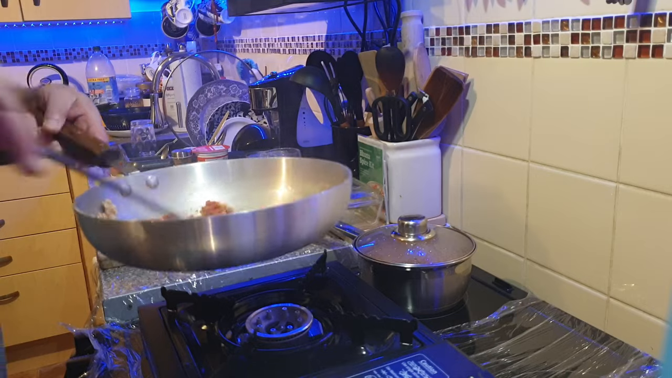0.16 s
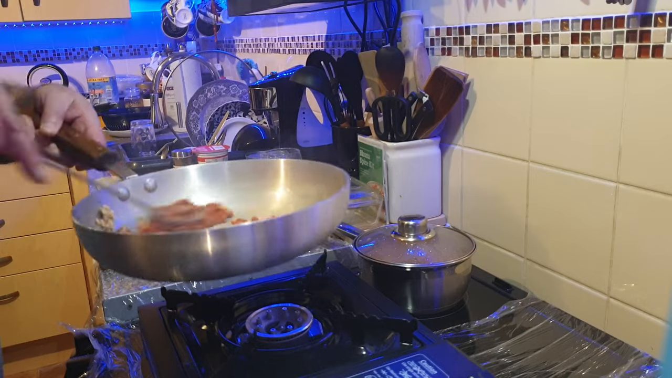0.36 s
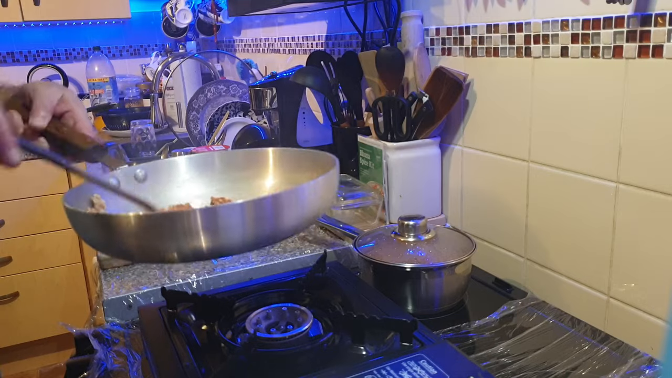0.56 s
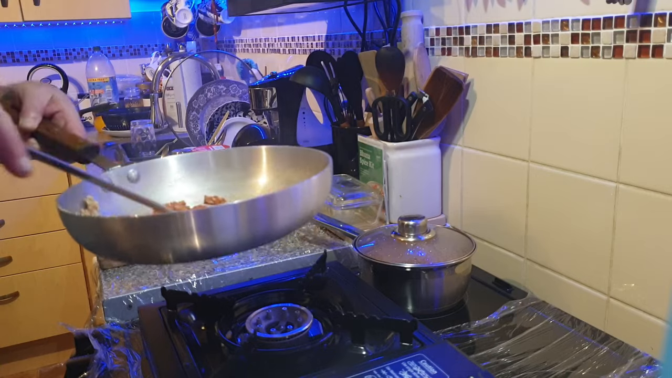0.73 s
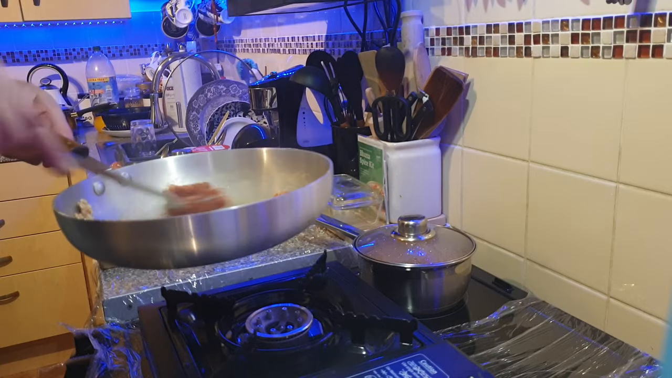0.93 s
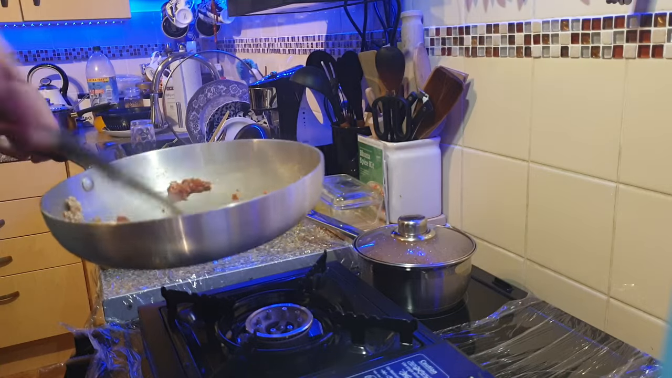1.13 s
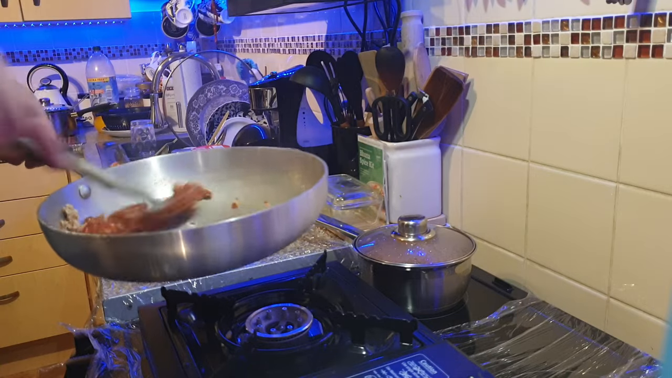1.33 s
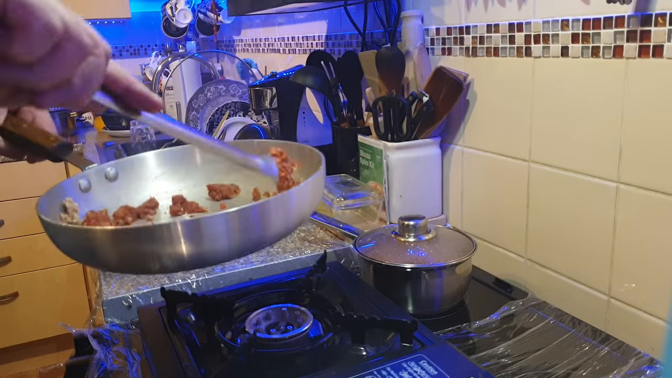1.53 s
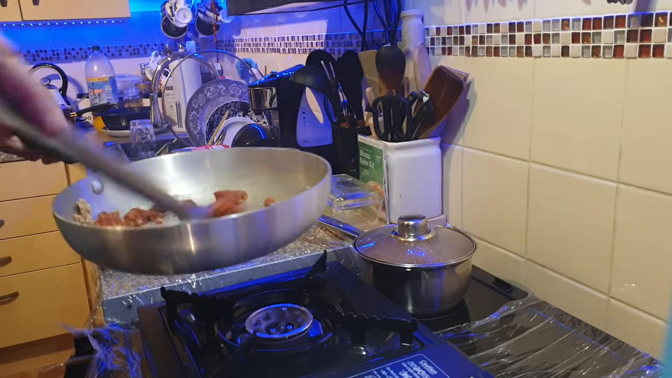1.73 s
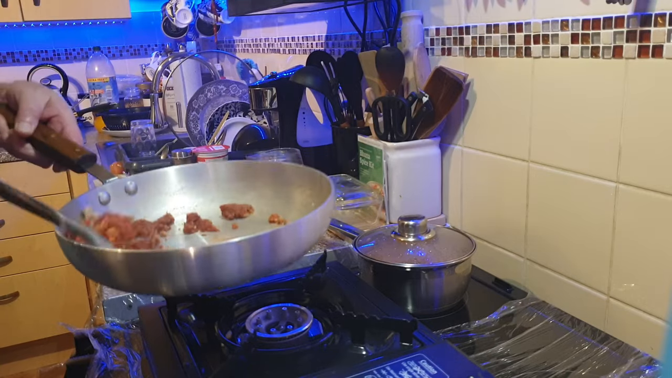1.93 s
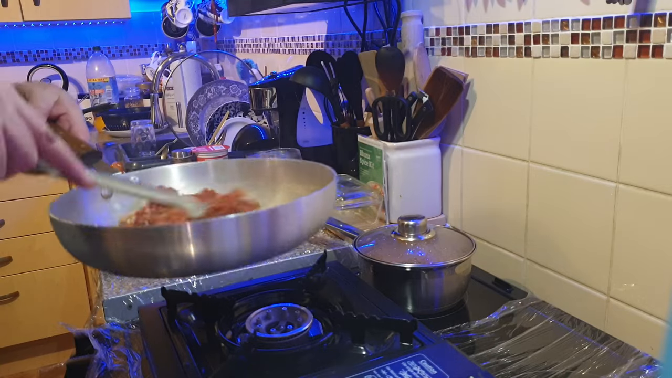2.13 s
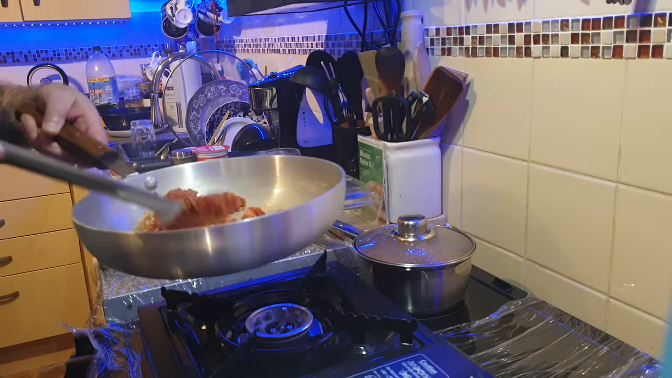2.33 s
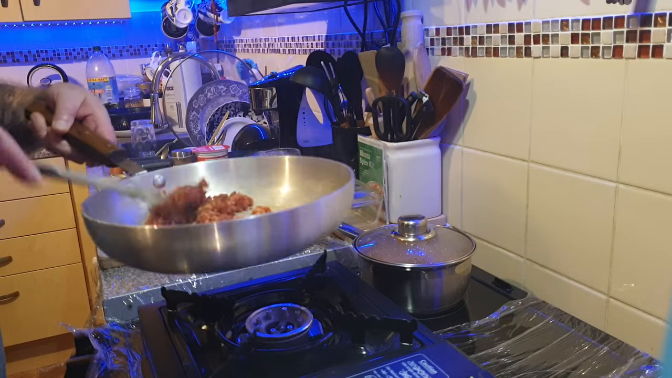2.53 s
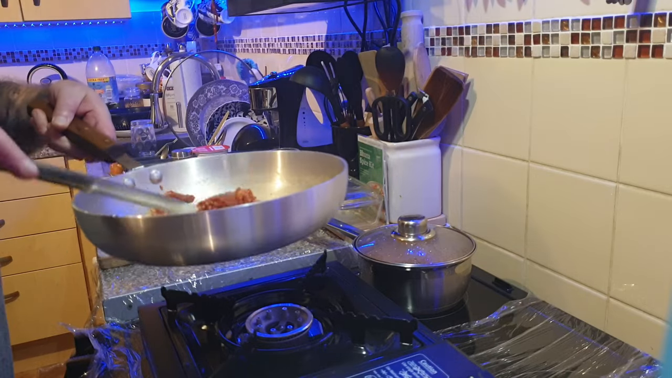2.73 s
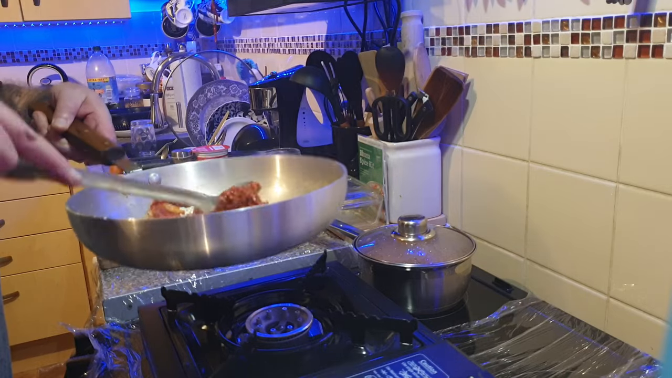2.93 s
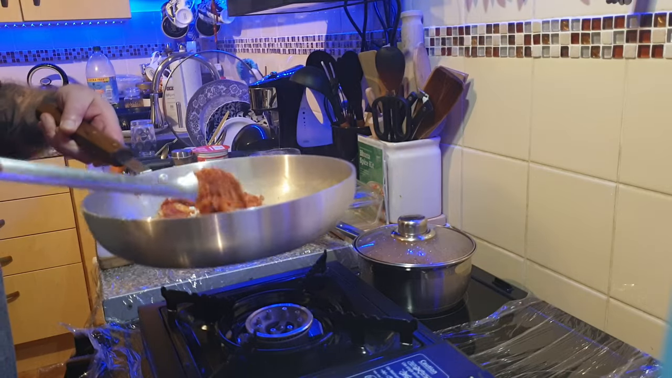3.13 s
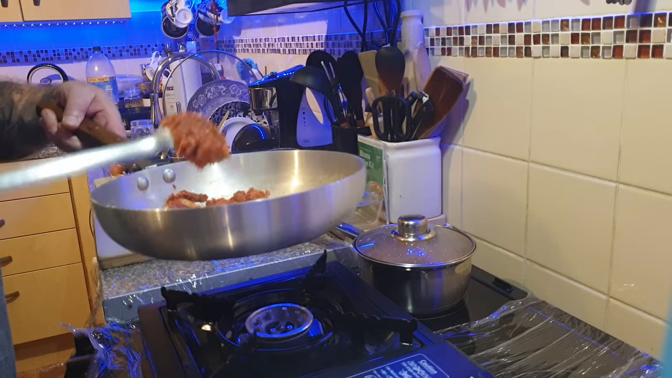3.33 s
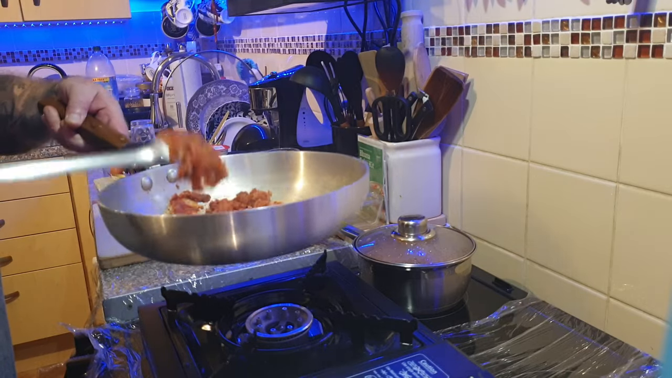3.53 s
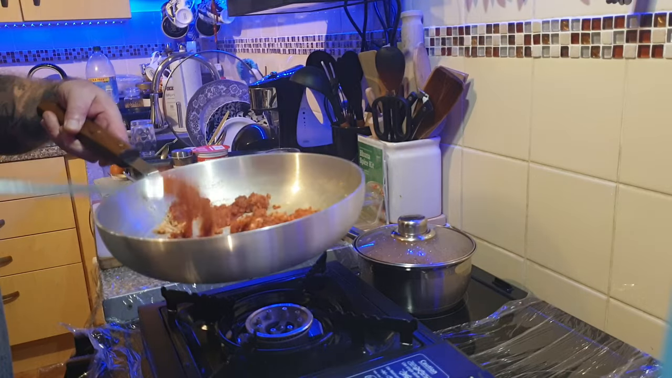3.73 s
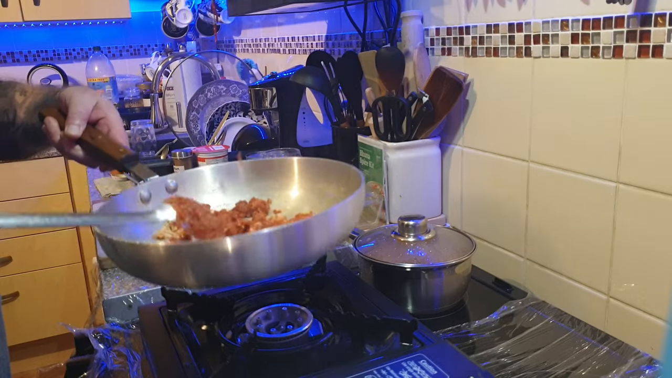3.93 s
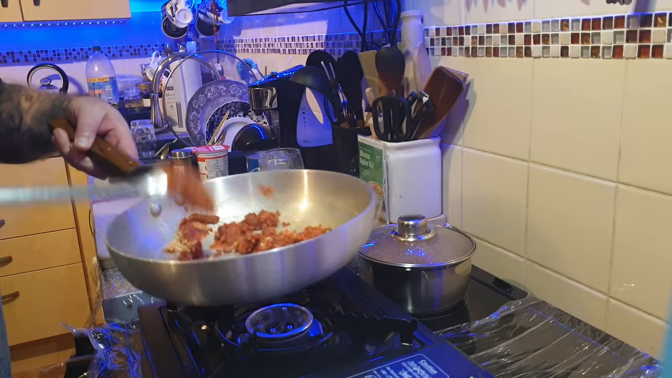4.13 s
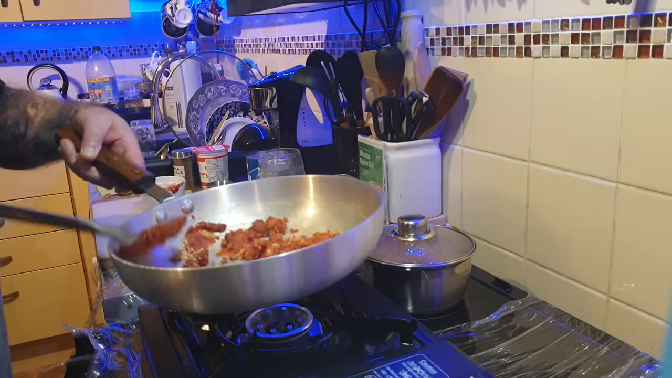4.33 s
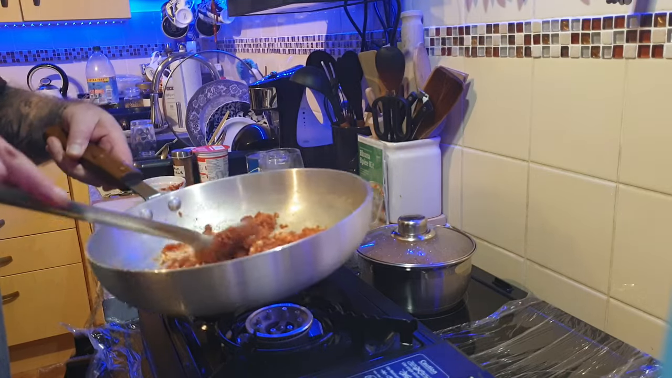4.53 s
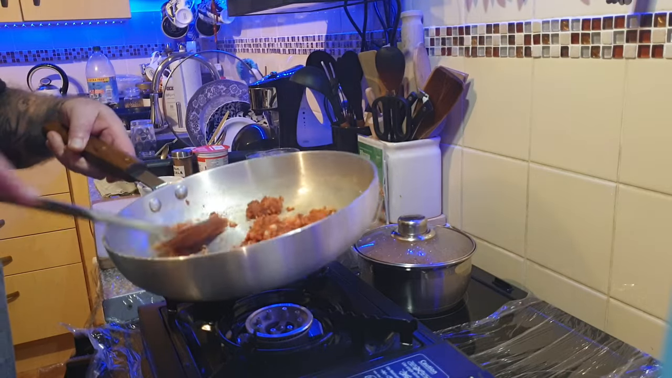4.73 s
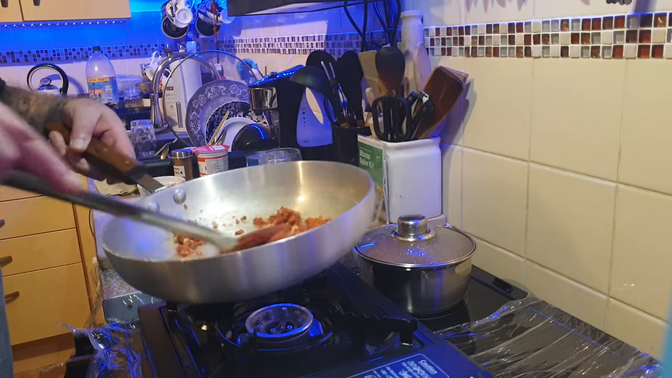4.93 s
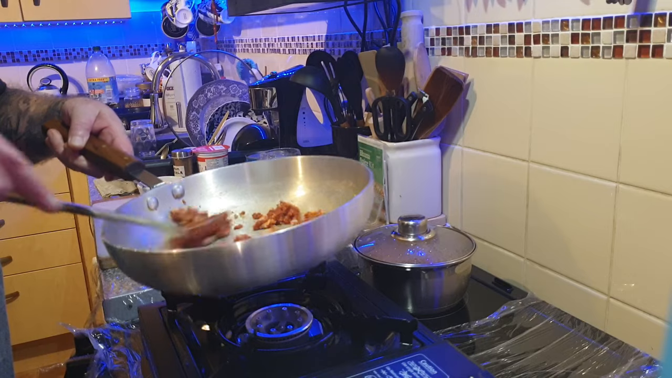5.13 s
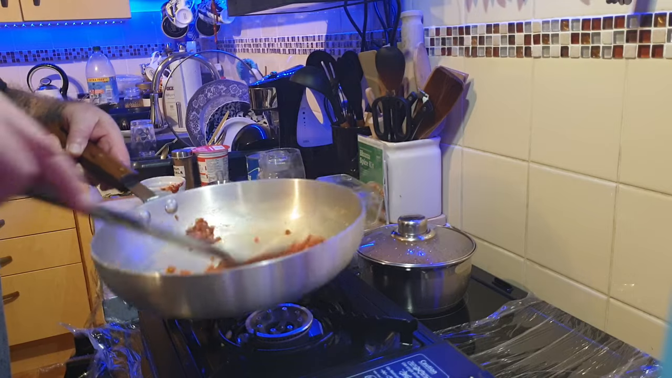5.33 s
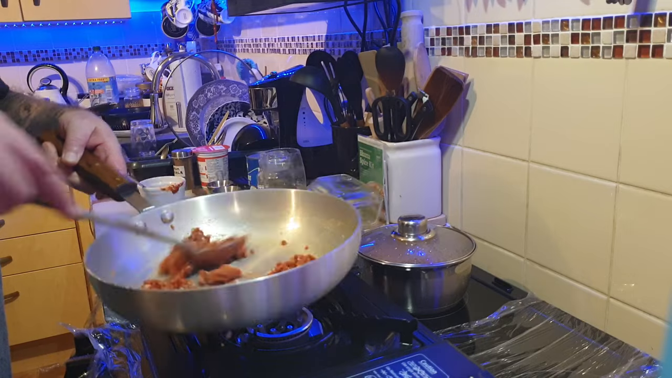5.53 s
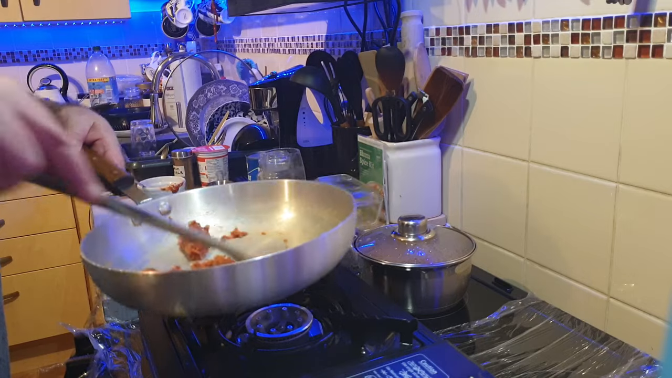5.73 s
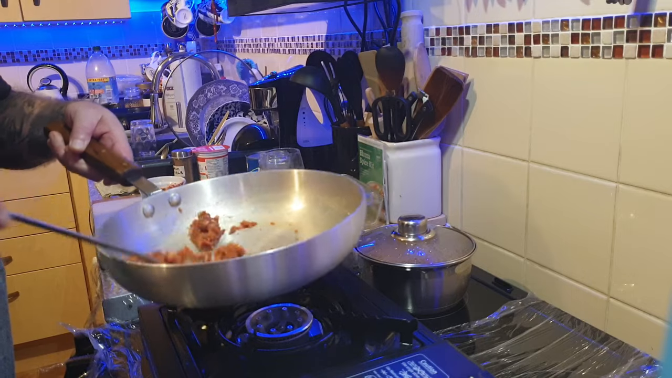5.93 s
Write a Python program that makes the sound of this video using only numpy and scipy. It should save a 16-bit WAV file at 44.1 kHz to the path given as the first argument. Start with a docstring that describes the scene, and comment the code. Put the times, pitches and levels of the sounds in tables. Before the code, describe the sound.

A thick paste fries in a steel pan, heard close in stereo in a small tiled kitchen. A dense, bright, crackly sizzle starts strongest, dips and swells unevenly, with bumps around 0.4, 1.3 and 1.9 seconds. Beneath lie a low flame and fan hum and two faint thin tones. A metal spoon makes soft gritty drags, with dull nudges of the pan floor and small damped taps around 1.2, 1.7 to 2.1 and 2.7 seconds. At 3.4 a solid clunk rings out, then two very loud, bright clanks hit the rim at 3.7 and 3.95, each with a tiny bounce and low thump, decaying quickly. The recording level drops at these knocks and stays down, so sizzle and hum are fainter. Taps follow near 4.4, then short raspy scrapes from 4.45 to 5.3, a fuller hollow stroke with a sizzle swell at 5.5, and a last tap at 5.9.

```python
"""A thick paste sizzles in a steel pan while a steel spoon scrapes and stirs; then the spoon
knocks loudly on the rim. The sizzle is a random train of bubble bursts, the spoon rings damped modes
of the steel, and a low hum of flame and fan with two thin tones lies beneath as filtered noise.
The recorder's gain control turns everything down at the loud knocks and hardly recovers."""
import sys
import numpy as np
from scipy import signal
from scipy.io import wavfile
from scipy.ndimage import uniform_filter1d

SR = 44100
rng = np.random.default_rng(int(sys.argv[2]) if len(sys.argv) > 2 else 0)


def ratio_of_db(decibels):
    """Turn decibels (scalar or array-like) into linear amplitude factors; 0 dB maps to 1."""
    return 10 ** (np.asarray(decibels, float) / 20)


def dump(signal):
    """Clip the signal to [-1, 1] and save it as 16-bit WAV at the path in sys.argv[1]."""
    limited = np.clip(np.atleast_2d(signal).T, -1, 1)
    pcm = np.round(limited * 32767).astype(np.int16)
    wavfile.write(sys.argv[1], SR, pcm)


N = 263277

# Colour of the microphone pair: (frequency [Hz], left minus right [dB])
LEAN = [(60, -1.5), (200, -0.5), (500, -1), (1100, -2.5), (2000, -2), (3000, -0.5), (4200, -6),
        (6300, -11.5), (7500, -0.5), (8300, -3.5), (9500, 11), (10700, -10), (12000, -2), (14000, -7),
        (15500, 6)]
# Strong modes of pan and spoon, damped by paste and hand: (frequency [Hz], level [dB], t60 [s])
PAN_MODES = [(660, -14, .08), (755, -5, .14), (850, -2, .15), (935, -9, .11), (1490, -3, .14),
             (1560, -9, .1), (1845, -12, .11), (2030, -12, .1), (2388, -3, .13), (2485, -6, .1),
             (2682, -1, .12), (2845, -2, .13), (2950, -6, .12), (3230, -11, .11), (3591, -8, .11),
             (3738, -1, .13), (3900, -5, .12), (4221, -6, .11), (4452, -8, .11), (4770, -7, .2),
             (5200, -8, .11), (5361, -1, .18), (5717, -3, .13), (5921, -2, .15), (6400, -8, .12),
             (6655, -1, .13), (7050, -11, .1), (7494, -1, .15), (8640, -10, .09), (8845, -11, .11),
             (10300, -5, .12), (11700, -13, .1)]
# Edges between five groups of modes: frequency [Hz]
GROUP_EDGES = [1200, 2150, 4200, 7800]
# Loud knocks on the free rim:
# (time [s], energy [dB], bounce delay [s], bounce relative level [dB], thump level [dB])
RIM_KNOCKS = [(3.7035, -24.5, 0.028, -8.5, -16), (3.948, -22.5, 0.018, -8, -17)]
# Taps on the paste-covered steel: (time [s], energy [dB], brightness [dB per group],
# mode left ringing [Hz], its level [dB], thud level [dB])
TAPS = [(1.173, -61, -0.5, 850, -39.5, -50), (1.68, -71, -1, 755, -41, -54),
        (1.754, -60, 3, 2845, -27.5, -50), (1.861, -63.5, -3, 1560, -31, -30),
        (1.866, -66, 1, 755, -32, -44), (2.106, -67, 6, 3520, -29.5, -50), (2.671, -60, 1, 660, -45, -24.5),
        (2.682, -52.5, 1.5, 6400, -31, -45), (3.4415, -33.5, 0, 1480, -17, -8),
        (3.444, -47.5, 3.5, 8640, -11.5, -19), (4.388, -52.5, -0.5, 1845, -17, -21),
        (4.392, -58, -2, 2485, -22, -56), (4.454, -59, -1.5, 2800, -29, -26),
        (5.9256, -47.5, 1.5, 5600, -26, -37)]
FLOOR_HZ = 855  # lowest strong mode of the pan floor


def evened(x):
    """Normalisation: scales a signal to an rms of 1."""
    return x / np.sqrt(np.mean(x ** 2) + 1e-20)


def read(points, hz):
    """Interpolation of a spectrum on a logarithmic frequency axis."""
    f, value = np.transpose(points)
    return np.interp(np.log(hz + 1), np.log(f + 1), value)


def add(mix, s, sound):
    """Superposition: adds a stereo sound to the mix from time s [s]."""
    part = mix[:, round(s * SR):][:, :sound.shape[1]]
    part += sound[:, :part.shape[1]]


def pair(left, other, hz):
    """Interchannel coherence: blends two independent spectra into a pair that is alike in the bass."""
    # (frequency [Hz], left-right likeness [0 to 1])
    likeness = [(60, 1), (180, 0.81), (550, 0.83), (1650, 0), (4970, 0), (15000, 0.066)]
    same = np.clip(read(likeness, hz), 0, 1)[:, None]
    lean = ratio_of_db(read(LEAN, hz) / 2)[:, None]
    right = same * left + np.sqrt(1 - same ** 2) * other
    return np.array([left * lean, right / lean])


def hum():
    """Filtered noise for flame and fan rumble; phase diffusion broadens two thin tones into narrow lines."""
    # Rumble spectrum: (frequency [Hz], relative density [dB per Hz])
    rumble = [(15, -29), (25, -25), (65, -9), (86, 0.5), (102, 6), (174, -10.5), (271, -2), (287, 2.5),
              (312, -60), (325, -34), (344, -12), (374, -1.5), (442, -1.5), (530, -15), (700, -6),
              (910, -14), (1540, -120)]
    # Steady appliance tones: (frequency [Hz], line width [Hz], level [dB])
    whines = [(348.7, 1.62, -50.5), (6480, 21, -55)]
    hz = np.fft.rfftfreq(4096, 1 / SR)
    a, b, c, d = rng.standard_normal((N // 1024 + 5, len(hz), 4)).T
    z = pair(a + 1j * b, c + 1j * d, hz) * ratio_of_db(read(rumble, hz))[:, None]
    noise = signal.istft(z, nperseg=4096, noverlap=3072)[1][:, :N]
    out = ratio_of_db(-49) * evened(noise)
    for tone_hz, width_hz, db in whines:
        drift = np.cumsum(rng.standard_normal(N)) * np.sqrt(2 * np.pi * width_hz / SR)
        lean = ratio_of_db(read(LEAN, tone_hz) / 2)
        tone = np.sin(2 * np.pi * tone_hz * np.arange(N) / SR + drift)
        out += ratio_of_db(db) * np.outer([lean, 1 / lean], tone)
    return out


def sizzle(pops_per_s=7000, spread_db=2.0, patchy_db=-1.37, tail_s=0.18, wet=1.0):
    """Shot noise: thousands of steam bubbles burst at random each second; the tiles smear them a little."""
    # Loudness course: (time [s], level before the lift in the mix [dB])
    course = [(0.0, -28.5), (0.11, -31.5), (0.22, -34.5), (0.36, -30.5), (0.58, -34.5), (0.85, -35),
              (0.99, -32.5), (1.16, -36), (1.34, -32), (1.54, -35), (1.76, -33.5), (1.92, -31.5),
              (2.09, -32.5), (2.28, -37.5), (2.44, -36), (2.97, -34), (3.3, -36), (3.63, -38.5),
              (4.5, -36.5), (5.06, -37), (5.39, -36), (5.5, -32.5), (5.65, -35.5), (5.97, -35.5)]
    # Spectrum of the bursts: (frequency [Hz], relative density [dB per Hz])
    fizz_spectrum = [(260, -21.5), (450, -13), (563, -13), (759, -19), (950, -13), (1190, -12.5),
                     (1600, -8.5), (1700, -10.5), (2160, -11.5), (3190, -5), (3760, -8), (6430, -4),
                     (7580, -5), (12200, 1), (16000, -1.5)]
    low_steady = 0.23  # share of each swell that the part below 7700 Hz ignores

    size = ratio_of_db(spread_db * rng.exponential(1, N)) * (rng.random(N) < pops_per_s / SR)
    # echoes: noise that dies after each pop
    keep = np.exp(-2 * np.log(1000) / SR / tail_s)
    smear = np.sqrt(signal.lfilter([1 - keep], [1, -keep], size ** 2))
    pops = size * rng.choice([-1., 1.], (2, N)) + wet * smear * rng.standard_normal((2, N))

    # colour, with random patches over frequency and time
    hz, t, z = signal.stft(pops, SR, nperseg=512, noverlap=384)
    patches = uniform_filter1d(rng.standard_normal(z.shape[1:]), 10, 0)
    patches = evened(uniform_filter1d(patches, 24, 1))
    z = pair(*z, hz) * ratio_of_db(read(fizz_spectrum, hz)[:, None] + patchy_db * patches)

    s, level_db = np.transpose(course)
    swell_db = np.interp(t, s, level_db - level_db.mean())
    lift_db = -low_steady * swell_db * (hz < 7700)[:, None]
    fizz = evened(signal.istft(z * ratio_of_db(lift_db), SR, nperseg=512, noverlap=384)[1][:, :N])
    return fizz * ratio_of_db(np.interp(np.arange(N) / SR, s, level_db))


def kitchen(x, t60):
    """Reverberation: sparse echoes of random sign from tiles and cupboards decay exponentially."""
    taps = np.zeros((2, 14000))
    at = np.arange(150, 13970, 22) + rng.integers(0, 22, (2, 629))
    np.put_along_axis(taps, at, rng.choice([-1., 1.], at.shape), 1)
    taps *= ratio_of_db(-60 * np.arange(14000) / SR / t60)
    return signal.fftconvolve(x.mean(0)[None], taps / np.linalg.norm(taps[0]), axes=1)[:, :N]


def modes(split=0.0113, twin_db=-4, count=3):
    """Mode splitting: in a pan not quite round each mode has weaker neighbours; all decay exponentially."""
    crowd_hz = np.geomspace(700, 15600, 300) * rng.uniform(.99, 1.01, 300)
    # many weak modes between the strong ones, 7 dB weaker in the top group
    crowd = [(f, -12 - 7 * (f > GROUP_EDGES[-1]), .11) for f in crowd_hz]
    twins = [(f * (1 + split * rng.standard_normal()), db + twin_db, t60)
             for f, db, t60 in PAN_MODES * count]
    hz, db, t60 = np.transpose(PAN_MODES + twins + crowd)
    t = np.arange(8000) / SR
    waves = np.exp(np.outer(2j * np.pi * hz - np.log(1000) / t60, t)) * ratio_of_db(db)[:, None]
    return waves * np.minimum(t / 0.00013, 1), hz, ratio_of_db(read(LEAN, hz) / 2)


def ring(body, group_db, damping, near_hz=0, near_db=0, chance_db=-2.0):
    """Modal superposition: a blow shares energy among mode groups; one favoured mode may stay undamped."""
    waves, hz, lean = body
    group = np.digitize(hz, GROUP_EDGES)
    luck = rng.standard_normal((len(group), 3))
    share = ratio_of_db(chance_db * luck[:, 0])
    power = (abs(waves) ** 2).sum(1) / SR / 2
    group_energy = np.bincount(group, share ** 2 * power)
    share = share * (ratio_of_db(np.asarray(group_db)) / np.sqrt(group_energy))[group]

    # phases differ less between the ports in the bass
    phase = np.exp(1j * (np.pi * luck[:, 1] + luck[:, 2] * np.outer([0, 1], group + 0.22)))
    ports = phase * [lean, 1 / lean]
    extra_decay = ratio_of_db(-damping * np.arange(waves.shape[1]) / SR)  # damping [dB/s]
    sound = (ports * share) @ waves * extra_decay
    if near_hz:
        k = np.argmin(abs(hz[:len(PAN_MODES)] - near_hz))
        favoured = np.outer([lean[k], 1 / lean[k]], waves[k])
        sound = sound + favoured * ratio_of_db(group_db[group[k]] + near_db) / abs(waves[k]).max()
    return sound.imag


def pings():
    """Free damped vibration: thumps, thuds, nudges and tapped modes are dying tones with a soft start."""
    # Low body of the loaded pan: (frequency [Hz], level relative to the tap's thud [dB], t60 [s])
    thud = [(62, -21, 0.11), (279, -17.5, 0.16), (636, 7.5, 0.017)]
    # Soft nudges that wake only the pan floor: (time [s], level [dB])
    nudges = [(0.041, -42.5), (.13, -41), (.24, -41), (.53, -38), (1.031, -42), (2.23, -39), (5.285, -40)]
    thump_hz, thump_t60 = 55, 0.082  # the pan jolts in the hand [Hz, s]
    out, t = np.zeros((2, N)), np.arange(12000) / SR
    delay = np.array([[0], [.0001]])  # the right port leads in phase by this time [s]

    tones = [(row[0], thump_hz, row[-1], thump_t60) for row in RIM_KNOCKS]
    tones += [(row[0], hz, row[-1] + db, t60) for row in TAPS for hz, db, t60 in thud]
    tones += [(s, FLOOR_HZ * rng.normal(1, .012), db, .2) for s, db in nudges]
    for s, _, _, near_hz, db, _ in TAPS:
        hz, _, t60 = min(PAN_MODES, key=lambda mode: abs(mode[0] - near_hz))
        tones.append((s, hz, db, t60))

    for s, hz, db, t60 in tones:
        lean = ratio_of_db(read(LEAN, hz) / 2) ** np.array([[1], [-1]])
        envelope = ratio_of_db(db - 60 * t / t60) * np.minimum(hz * t / 3, 1)
        add(out, s, lean * envelope * np.sin(2 * np.pi * hz * (t + delay)))
    return out


def knocks(out, body, crack_db=20, crack_s=0.018):
    """Impulse excitation: each blow rings the modes and adds a short noise burst from the contact."""
    # Energy of each mode group, low to high: relative level [dB]
    rim_shape = [-7, -11, 1, -0.5, -6.5]
    tap_shape = [-5.5, -2, 2.5, 2, 0]
    rim_damping, tap_damping = 35, 265  # beyond the decay of the modes [dB/s]
    step = np.arange(len(tap_shape)) - 2
    blows = [(s + after, db + less + np.array(rim_shape), rim_damping)
             for s, db, gap, bounce, _ in RIM_KNOCKS for after, less in ((0, 0), (gap, bounce))]
    blows += [(s, db + tilt * step + tap_shape, tap_damping) for s, db, tilt, *_ in TAPS]
    t = np.arange(600) / SR
    for s, group_db, damping in blows:
        crack = rng.standard_normal((2, 600)) * ratio_of_db(group_db[-1] + crack_db - 60 * t / crack_s)
        add(out, s, ring(body, group_db, damping))
        add(out, s, crack)


def scrapes(out, body, grit):
    """Source-filter principle: a short stroke of gritty friction noise is convolved with the steel."""
    # (time [s], length [s], energy [dB], brightness [dB per group], favoured mode [Hz])
    strokes = [(0.032, 0.013, -62.5, 0, 1500), (0.255, 0.053, -62.5, -2, 2500),
               (0.381, 0.06, -60, 0.5, 5900), (2.256, 0.028, -67, 3, 1530), (2.685, 0.07, -53.5, 0.5, 3740),
               (2.967, 0.024, -62.5, 3.5, 3400), (3.052, 0.051, -63, 2, 1600), (4.452, 0.03, -48, 2, 5717),
               (4.55, 0.031, -52.5, 1, 6400), (4.711, 0.03, -52, -2, 1500), (4.82, 0.045, -57.5, 2, 6655),
               (4.91, 0.037, -60, -2, 1500), (5.174, 0.018, -57, 0.5, 6400), (5.272, 0.032, -64, 3, 6400),
               (5.525, 0.012, -54, -1.5, 3800)]
    # Energy of each mode group, low to high: relative level [dB]
    scrape_shape = [-11, -4, 3, 0.5, 0.5]
    ring_db = 19  # start of the favoured mode above the energy of its group
    damping = 230  # the pressed spoon stills the steel [extra dB/s]
    step = np.arange(len(scrape_shape)) - 2
    for s, length, db, tilt, hz in strokes:
        stroke = np.hanning(round(length * SR))
        stroke = stroke * grit[round(s * SR):][:len(stroke)]
        steel = ring(body, db + tilt * step + scrape_shape, damping, hz, ring_db)
        add(out, s, signal.fftconvolve(steel, stroke[None] / np.linalg.norm(stroke), axes=1))


def drags(body, grit):
    """Sustained friction: long strokes through the paste drive the pan floor's hum and the spoon's rasp."""
    # (middle [s], length [s], hum of the pan floor [dB], rasp of the spoon [dB])
    table = [(0.038, 0.33, -53, -43), (0.236, .16, -52, -41), (0.527, 0.57, -57, -42.5),
             (1.024, 0.21, -53, -42.5), (1.27, 0.56, -54.5, -45), (1.778, 0.44, -46, -40),
             (2.212, 0.33, -49, -42), (2.724, 0.18, -48, -37.5), (3.04, 0.42, -57.5, -50),
             (4.114, 0.19, -52, -75), (4.445, .15, -74, -38), (4.578, 0.18, -48.5, -34.5),
             (4.707, 0.22, -56, -37), (4.906, 0.15, -56, -39), (5.27, 0.5, -52, -42),
             (5.533, 0.17, -39.5, -39), (5.673, 0.23, -54, -41.5), (5.907, 0.31, -62, -45.5)]
    # Rasp of the four upper mode groups: relative level [dB]
    rasp_shape = [-5.5, 0.5, -5, 0.5]
    rasp_damping = 67  # paste on the spoon [extra dB/s]
    s, length, floor_db, rasp_db = np.transpose(table)
    phase = np.clip((np.arange(N)[:, None] / SR - s) / length, -.5, .5)
    strokes = np.cos(np.pi * phase) ** 2
    t = np.arange(8000) / SR
    floor = ratio_of_db(-60 * t / .1) * np.sin(2 * np.pi * FLOOR_HZ * t + [[0], [.6]])
    rasp = ring(body, [-30] + rasp_shape, rasp_damping)
    out = np.zeros((2, N))
    for steel, db in ((floor, floor_db), (rasp, rasp_db)):
        push = evened(grit) * (strokes @ ratio_of_db(db))
        out += signal.fftconvolve(steel / np.linalg.norm(steel[1]), push[None], axes=1)[:, :N]
    return out


def spoon(grit_db=5):
    """Shared resonator: knocks, short scrapes and long drags all excite the same steel."""
    body, out = modes(), np.zeros((2, N))
    roughness = evened(uniform_filter1d(rng.standard_normal(N), 300))
    grit = rng.standard_normal(N) * ratio_of_db(grit_db * roughness)
    knocks(out, body)
    scrapes(out, body, grit)
    return out + drags(body, grit)


def scene():
    """Superposition of steel, its room echoes, sizzle and hum."""
    # a small pan radiates little bass
    steel = signal.sosfilt(signal.butter(3, 560, "high", fs=SR, output="sos"), spoon())
    steel += pings()
    return steel + ratio_of_db(-5.0) * kitchen(steel, t60=0.19) + ratio_of_db(4.5) * sizzle() + hum()


def roll_off(x):
    """The treble ends steeply here."""
    return signal.sosfilt(signal.butter(12, 17000, fs=SR, output="sos"), x)


def record(dry, limit_db=-10.5):
    """Dynamic compression: gain drops at once on a loud knock and hardly recovers; soft ceiling; low-pass."""
    power_db = 10 * np.log10(abs(uniform_filter1d((dry ** 2).mean(0), 600)) + 1e-12)
    back = np.arange(N) * .2 / SR  # recovers .2 dB a second
    peak_db = np.maximum.accumulate(power_db + back) - back
    over_db = np.maximum(peak_db - limit_db, 0)
    held = np.tanh(dry / ratio_of_db(over_db) / 1.05) * 1.05
    edge = signal.firwin(1023, 15760, window=("kaiser", 9), fs=SR)
    return roll_off(signal.oaconvolve(held, edge[None], "same"))


dry = scene()
out = record(dry)
dump(out)
```